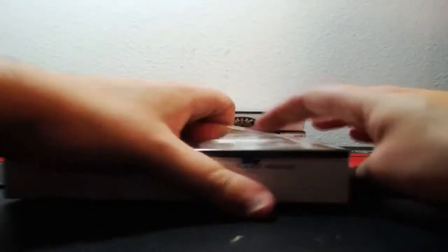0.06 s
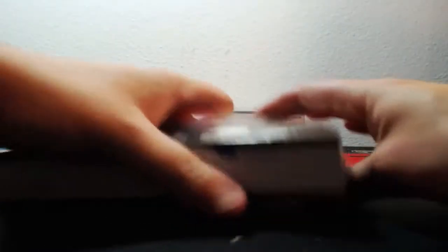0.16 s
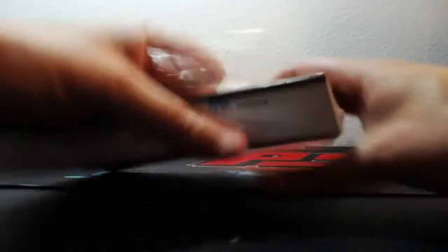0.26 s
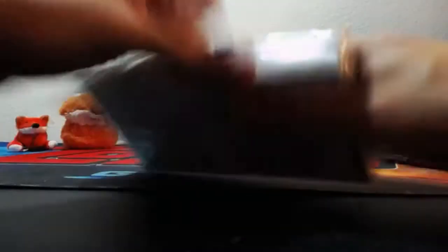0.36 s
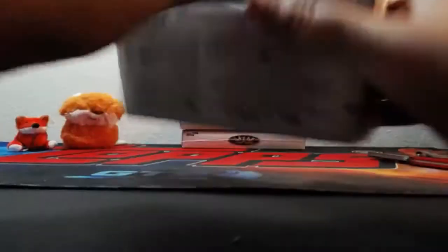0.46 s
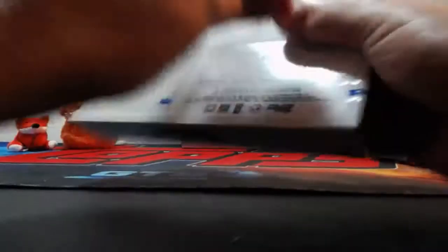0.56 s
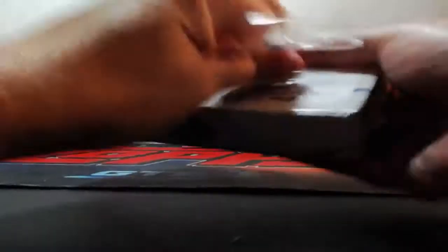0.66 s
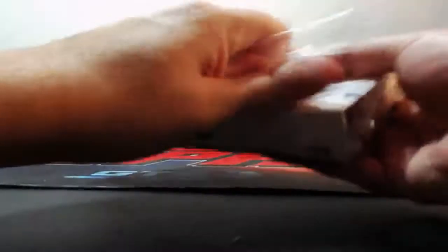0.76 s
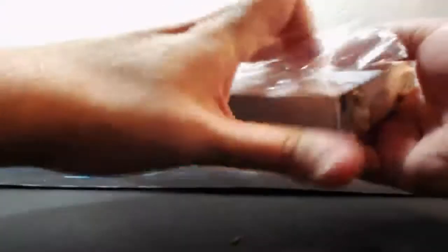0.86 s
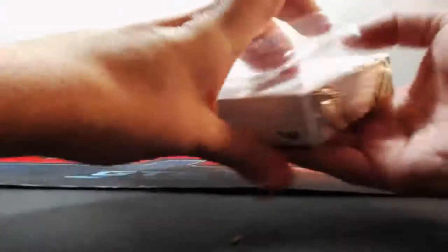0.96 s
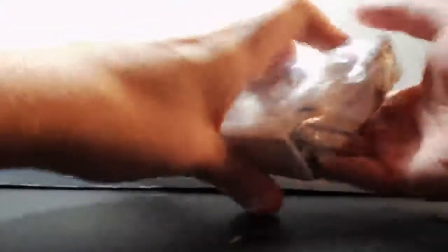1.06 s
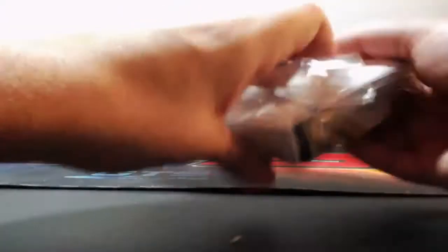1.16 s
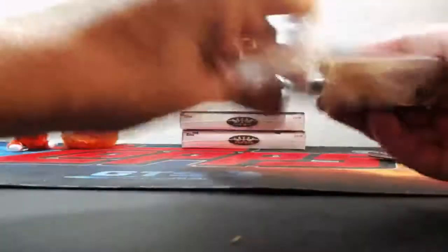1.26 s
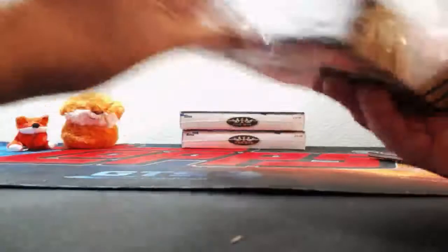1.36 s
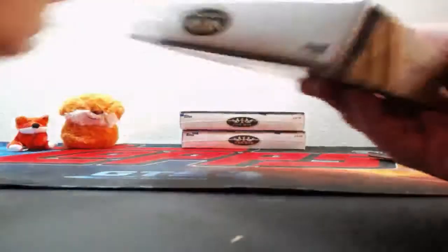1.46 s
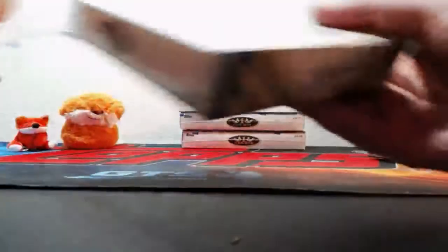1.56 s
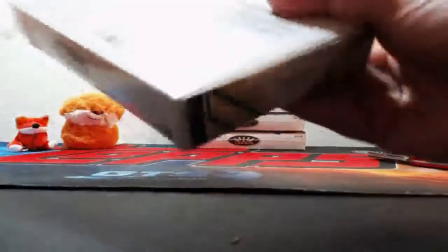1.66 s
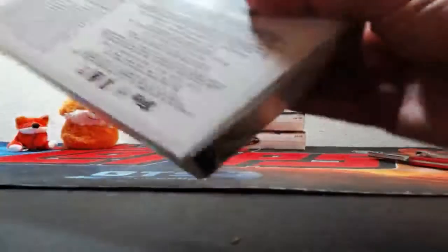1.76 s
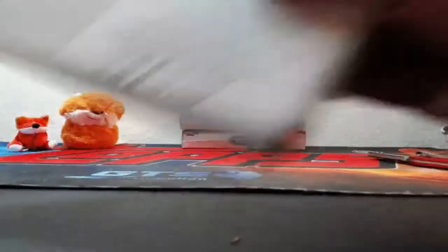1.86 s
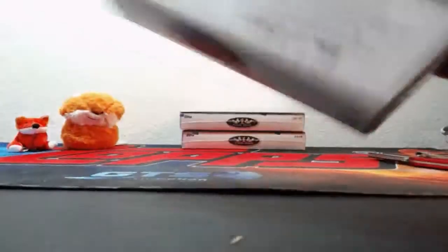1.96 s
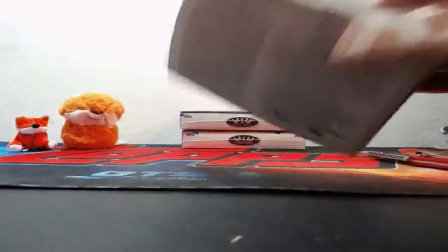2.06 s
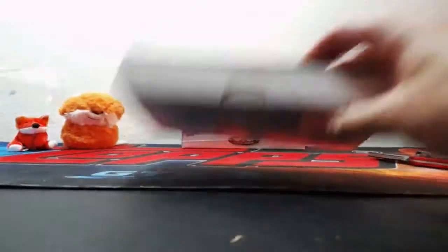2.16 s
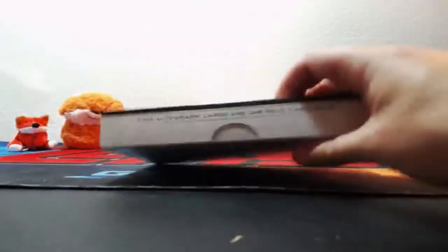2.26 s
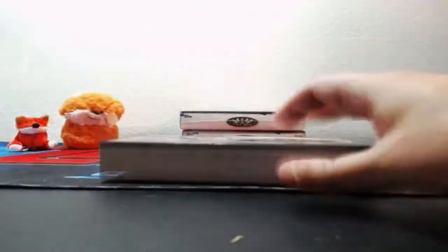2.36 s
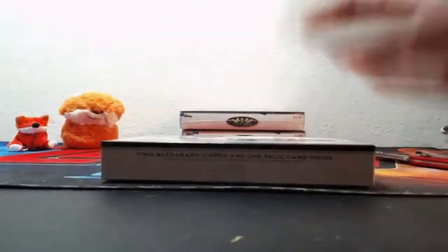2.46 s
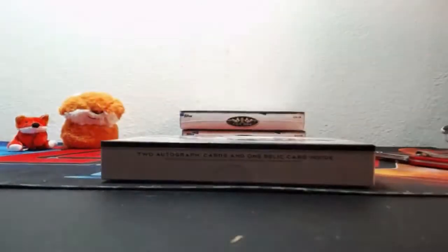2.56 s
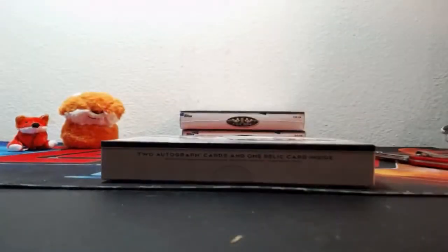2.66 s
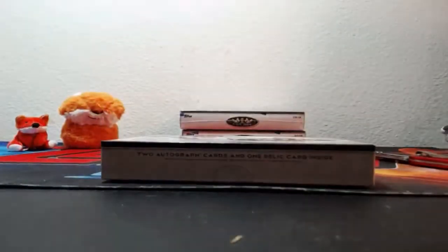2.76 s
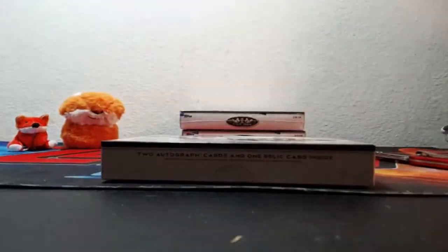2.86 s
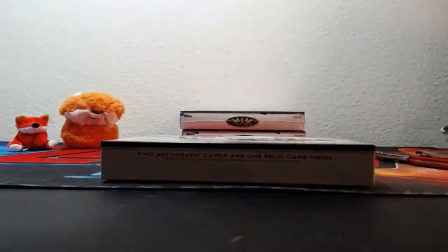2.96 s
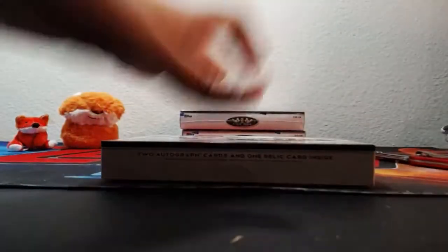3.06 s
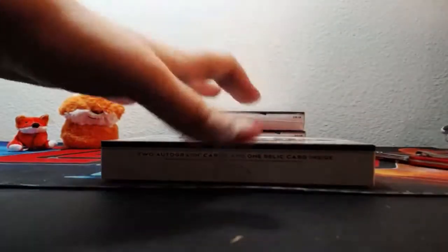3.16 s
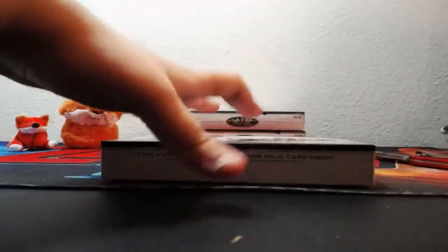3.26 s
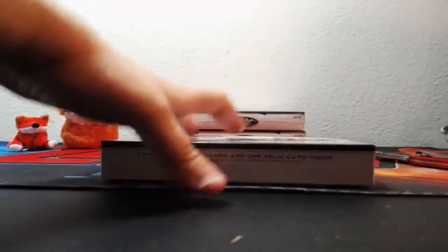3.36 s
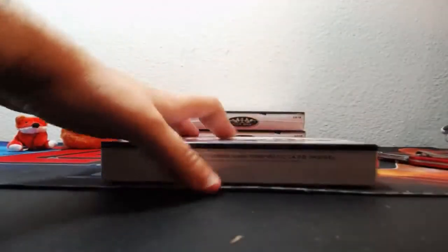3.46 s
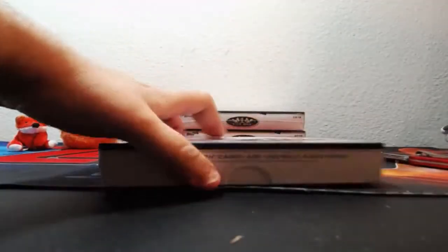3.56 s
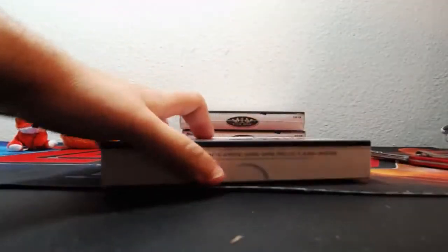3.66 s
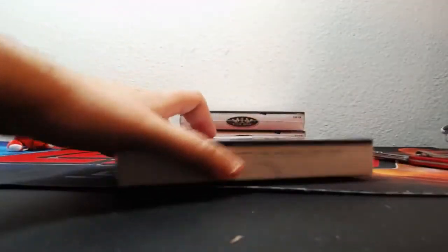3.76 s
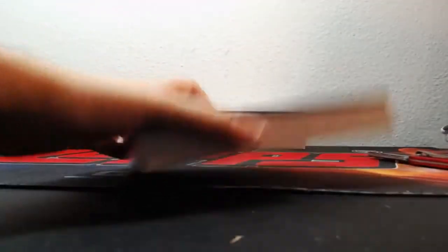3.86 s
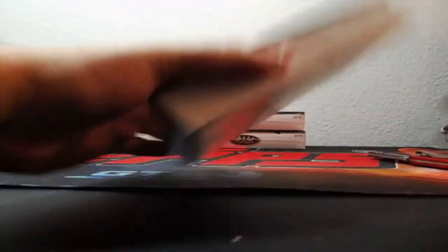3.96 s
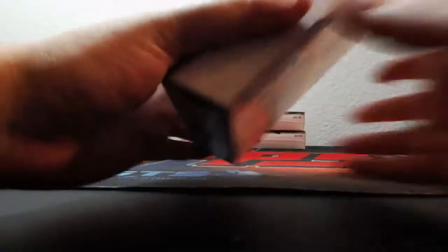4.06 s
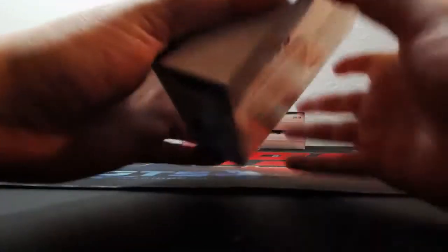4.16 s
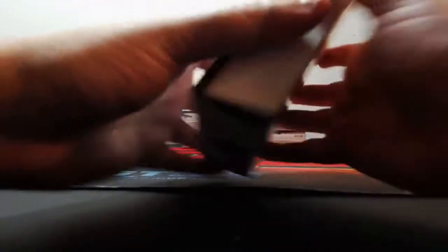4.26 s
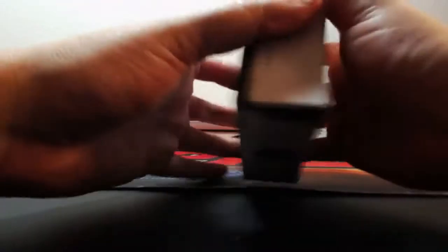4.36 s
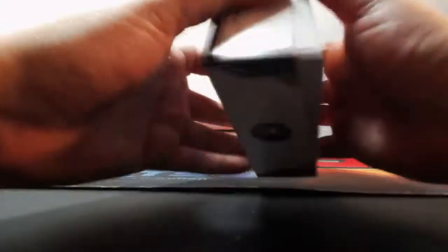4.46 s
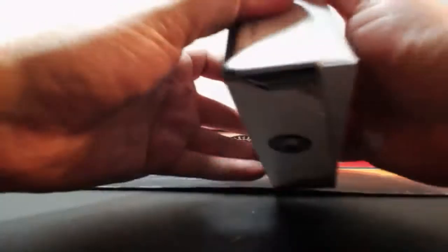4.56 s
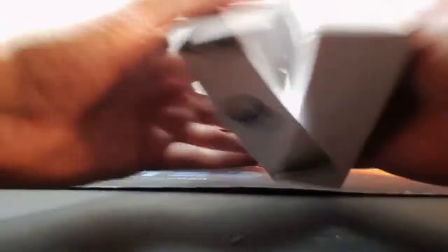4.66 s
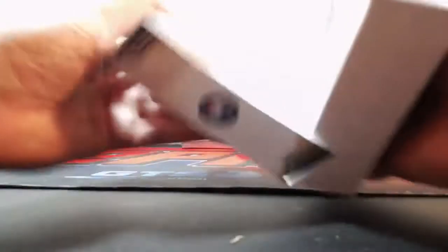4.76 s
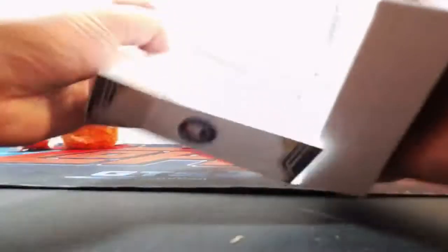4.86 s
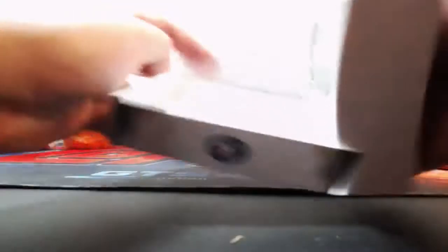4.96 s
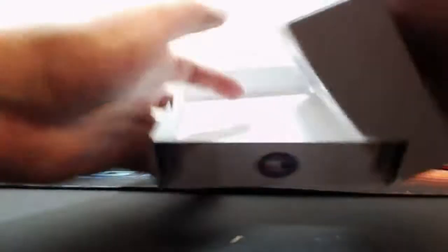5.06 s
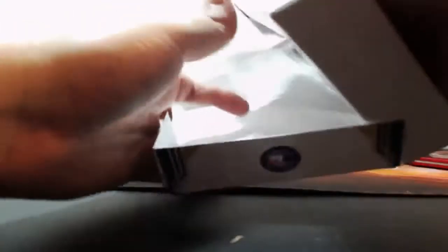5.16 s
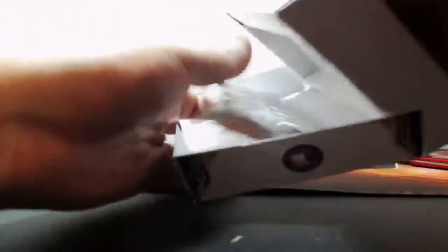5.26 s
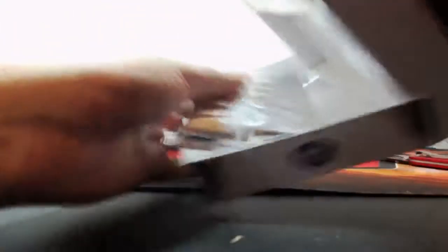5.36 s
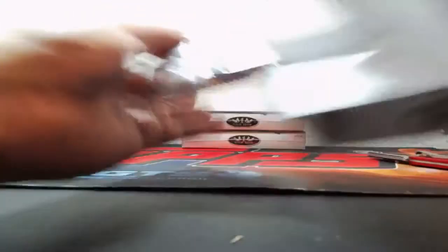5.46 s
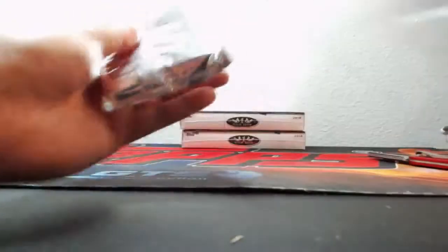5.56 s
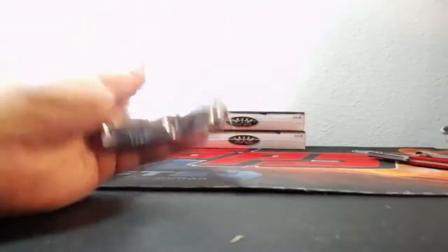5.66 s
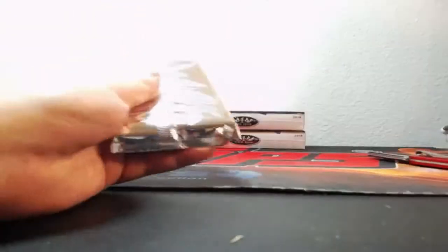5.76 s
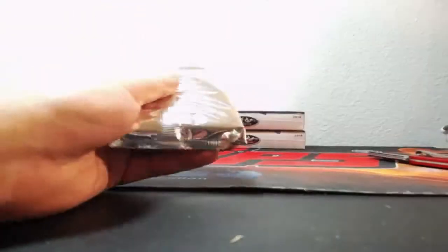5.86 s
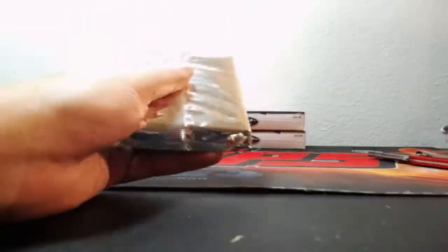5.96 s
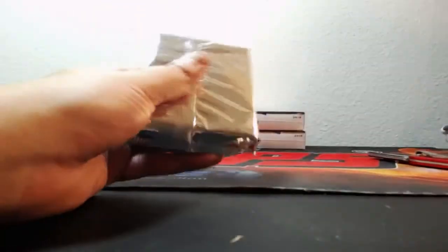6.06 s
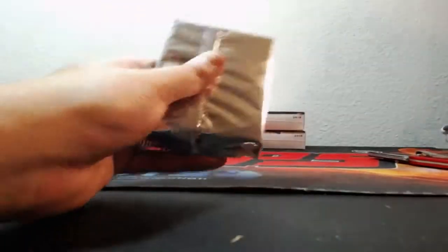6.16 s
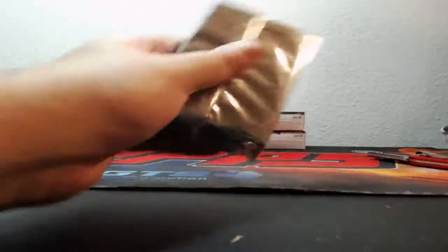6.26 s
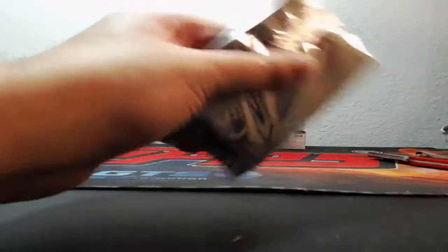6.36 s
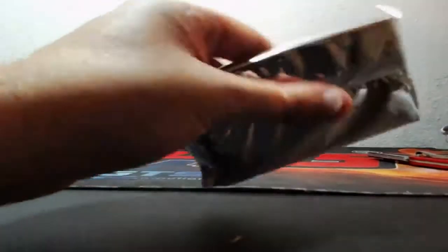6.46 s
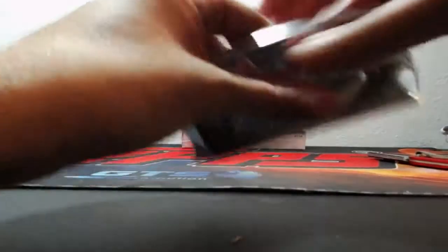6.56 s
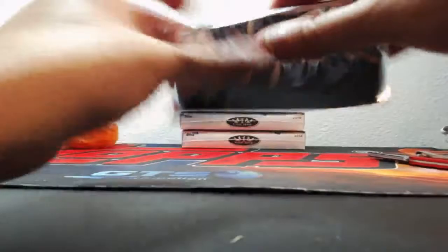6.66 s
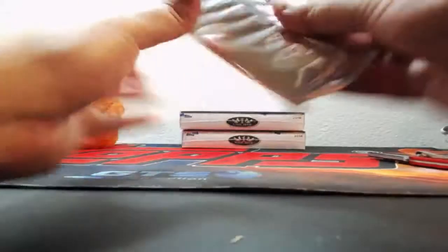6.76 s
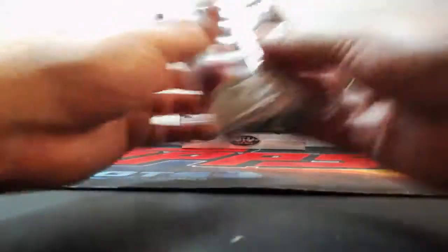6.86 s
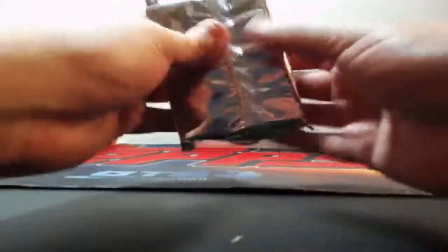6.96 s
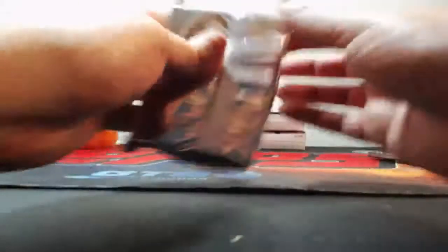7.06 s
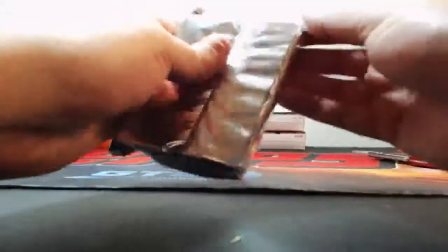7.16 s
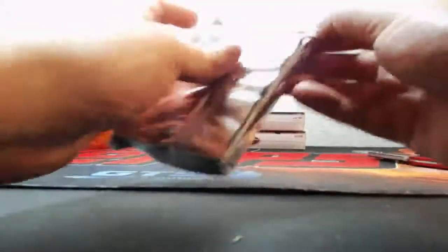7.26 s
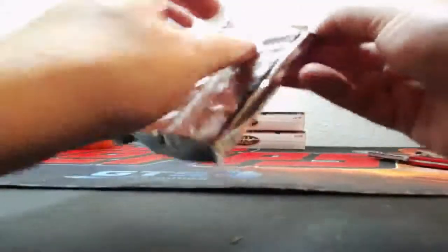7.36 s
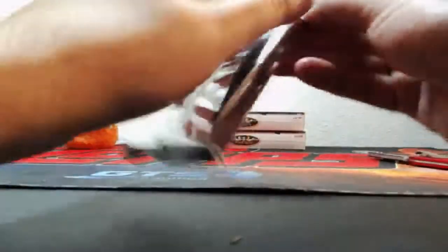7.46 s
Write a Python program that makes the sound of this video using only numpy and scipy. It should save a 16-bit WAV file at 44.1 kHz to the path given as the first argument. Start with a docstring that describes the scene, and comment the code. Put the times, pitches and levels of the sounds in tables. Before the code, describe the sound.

A quiet small room with a faint steady rush, miked closely in stereo. From 0 to 1.8 s hands work shrink film off a cardboard box: a hard snap and thud near 0.15, hollow low knocks and rubs, gentle crinkling, then dense bright rustle with a loud crack around 1.05-1.35 and a tight cluster of snaps at 1.73. At 2.15-2.3 the box lands on the desk in a few dull, woody thumps, followed by a brief film rustle at 2.5. Near silence until faint finger touches at 3.3-3.7. From 4 s soft card rubs and small creaks, a sharper knock at 4.55, then the lid opens with crisp pops at 5.07-5.3, the last hollow and loudest. A tiny click at 5.5 and a foil tick at 5.75. A scrape and hollow bump come at 6.08, then light, irregular foil crackles and dry ticks continue to 7.5.

```python
"""Film and foil buckle in sharp snaps, noise pulses filtered by sheet modes, over a bed of tiny creases.
Hands pull the shrink film off a cardboard box of trading cards, set the box on the desk, open its lid,
take out a foil pack and start to pinch it open, close to a small stereo microphone in a quiet room.
The box knocks with damped wall tones, noise and low thuds; creaks and rubs are stick-slip noise,
and the taut pack clicks through resonators. Reflections and a faint rush surround it all."""
import sys
import numpy as np
from scipy import signal
from scipy.fft import rfft, irfft, next_fast_len
from scipy.io import wavfile

SR = 44100
rng = np.random.default_rng(int(sys.argv[2]) if len(sys.argv) > 2 else 0)


def bounce(signal):
    """Save signal as a 16-bit WAV file at the path given by the first command-line argument."""
    frames = np.transpose(np.atleast_2d(signal))
    limited = np.clip(frames, -1, 1)
    pcm = np.round(limited * 32767).astype(np.int16)
    wavfile.write(sys.argv[1], SR, pcm)


N = 331191
TIME = np.arange(N) / SR  # s
HIT_TIME = TIME[:8192]  # s, long enough for one short event
TOP_HZ = 16300  # upper limit of the resonators and the microphone

# Spectrum of struck or scraped cardboard. Each row: frequency in Hz, relative level in dB per Hz.
CARDBOARD_SPECTRUM = [(30, -19.5), (120, -13), (230, -12), (400, -6.5), (650, -1), (900, 1.5),
                      (1250, -14.5), (1700, -20.5), (3000, -35.5), (8000, -65)]
# Stereo width of the two microphone ports. Each row: frequency in Hz, side minus mid in dB.
STEREO_WIDTH = [(250, -15), (600, -17), (1400, -4.5), (2800, -4), (5000, -0.5)]


def undb(db):
    """Decibels are logarithmic: 20 dB is a factor of ten in amplitude."""
    return 10 ** (np.asarray(db) / 20)


def unit(x):
    """Normalisation by mean power: scale to rms 1."""
    return x / np.sqrt(np.mean(x ** 2))


def dose(x, seconds=0.019):
    """Normalisation by energy: scale a transient to what rms 1 has over the given time."""
    energy = np.mean(np.sum(x ** 2, axis=-1))
    return x * np.sqrt(seconds * SR / energy)


def add(out, s, x):
    """Superposition: mix x into out from time s."""
    i = max(int(s * SR), 0)
    out[:, i:i + x.shape[-1]] += x[..., :max(N - i, 0)]


def colour(x, points):
    """Minimum-phase filtering: a causal response through (Hz, dB) points, from a folded cepstrum."""
    n = 2 * next_fast_len(x.shape[-1] // 2 + 512)
    hz, db = np.transpose(points)
    bin_hz = np.arange(n // 2 + 1) * SR / n
    gain = undb(np.interp(np.log(bin_hz + 1), np.log(hz), db))
    cepstrum = irfft(np.log(gain))
    cepstrum[1:n // 2] *= 2
    cepstrum[n // 2 + 1:] = 0
    response = np.exp(rfft(cepstrum))
    return irfft(rfft(x, n) * response)[..., :x.shape[-1]]


def resonate(x, hz, q):
    """Damped simple resonance: a two-pole band-pass whose ringing lengthens with q."""
    w = 2 * np.pi * min(hz, TOP_HZ) / SR
    a = np.sin(w) / (2 * q)
    return signal.lfilter([a, 0, -a], [1 + a, -2 * np.cos(w), 1 - a], x)


def burst(envelope):
    """Partial coherence: enveloped stereo noise, left and right alike in the bass, apart in the treble."""
    mid, side = rng.standard_normal((2, len(envelope))) * envelope
    side = colour(side, STEREO_WIDTH)
    return np.array([mid + side, mid - side])


def swell(t, rise, decay):
    """Exponential relaxation: an envelope that builds up and dies away."""
    return (1 - np.exp(-t / rise)) * np.exp(-t / decay)


def walk(rate):
    """Slow random modulation: a smooth wander through `rate` random points per second, spread near 1."""
    return np.interp(TIME * rate, np.arange(N), rng.standard_normal(N))


def grains(rate, spread_db, decay_s, smooth):
    """Shot noise: an envelope of countless small slips, a few much larger, over even sliding."""
    sizes = undb(spread_db * np.minimum(rng.exponential(size=N), 4))
    slips = (rng.random(N) < rate / SR) * sizes ** 2
    power = signal.lfilter([1], [1, -np.exp(-2 / (decay_s * SR))], slips)
    return np.sqrt(power / power.mean() + smooth ** 2)


def stroke(length, attack_s, sag_db_per_s, release_s):
    """Force of one hand movement: it takes hold, loses force while it lasts and lets go."""
    t = TIME[:SR]
    held = np.minimum(t, length)
    attack = np.minimum(t / attack_s, 1)
    release = np.exp((held - t) / release_s)
    return attack * undb(-sag_db_per_s * held) * release


def panel(x, hz, q, share, count=4):
    """Modal response: each bent patch of sheet has a few modes of its own, scattered around hz."""
    octaves = rng.uniform(-0.53, 0.48, count)
    return x + share * sum(resonate(x, hz * 2 ** octave, q) for octave in octaves)


def patches(lowest_hz, count, flicker_db):
    """Independent band modulation: half-octave noise bands flare and fade as the contact shifts."""
    pair = np.zeros((2, N))
    for hz in lowest_hz * 2 ** (np.arange(count) / 2):
        flickering = rng.standard_normal((2, N)) * undb(flicker_db * walk(70))
        pair += resonate(flickering, hz, 1.8) / np.sqrt(hz)
    side = colour(pair[1], STEREO_WIDTH)
    return np.array([pair[0] + side, pair[0] - side])


def room_tone():
    """Stationary broadband noise: a faint, even rush of room air and microphone hiss."""
    # Each row: frequency in Hz, relative level in dB per Hz.
    tone_spectrum = [(20, -0.5), (168, -10), (241, -9), (399, -11), (802, -14.5), (2000, -34),
                     (8650, -44.5), (16000, -57.5)]
    level_db = -53.5
    rush = burst(undb(1.3 * walk(15.0)))
    return undb(level_db) * unit(colour(rush, tone_spectrum))


def room(x, early_db=-16, early_s=0.0037, late_db=-24, late_s=0.031):
    """Reflection: desk and wall answer quickly; the small room adds a short, duller tail."""
    t = TIME[:SR // 2]
    early = burst((t > .002) * np.exp(-t / early_s))
    late = burst((t > .012) * np.exp(-t / late_s))
    late = colour(late, [(400, 9.0), (900, 2.5), (8000, -1.5), (15000, -7.5)])
    response = undb(early_db) * dose(early, 1 / SR) + undb(late_db) * dose(late, 1 / SR)
    return x + signal.fftconvolve(x, response, axes=1)[:, :N]


def desk():
    """Modal decay: the modes of the desk top boom on after the heaviest blows."""
    # Blows that reach the desk. Each row: start in seconds, level in dB.
    landings = [(0.169, -38), (2.151, -37), (2.288, -23.5)]
    # Modes of the desk. Each row: frequency in Hz, relative level in dB, 60 dB decay time in seconds.
    desk_modes = [(50, -3.5, 0.55), (100.8, 9, 0.36), (126, -3, 0.42), (534, -3, 0.2)]
    rise_s = 0.0062
    out, t = np.zeros((2, N)), TIME[:SR]
    boom = sum(undb(db - 60 * t / t60) * np.sin(2 * np.pi * hz * t) for hz, db, t60 in desk_modes)
    for s, db in landings:
        add(out, s, undb(db) * dose(boom, 0.13) * np.minimum(t / rise_s, 1))
    return out


def holding():
    """Random modulation of grip: faint rustle, crinkle and rub envelopes of fingers that never rest."""
    # Each row: start in seconds, end in seconds, rustle in dB, crinkle in dB, rub in dB.
    holds = [(-0.05, 1.9, -56, -60, -51.5), (3.97, 5.15, -67, -62, -55), (6.02, 7.52, -64.5, -65.5, -61.5)]
    grip_fade_s, fidget_db, fidget_per_s = 0.052, 4.2, 17
    out = 0
    for start, end, *db in holds:
        grip = np.clip(np.minimum(TIME - start, end - TIME) / grip_fade_s, 0, 1)
        out = out + undb(db)[:, None] * grip
    return out * undb(fidget_db * walk(fidget_per_s))


def rubbing(held):
    """Stick-slip friction of skin and card; the hollow box gives the scrape its pitch."""
    # Pushes of fingers, flaps and pack. Each row: start in seconds, length in seconds, level in dB.
    pushes = [(0.038, 0.12, -37), (0.114, 0.096, -27.5), (0.257, 0.2, -35), (0.572, 0.26, -37),
              (0.823, 0.09, -33.5), (0.915, 0.17, -36.5), (1.058, 0.14, -30.5), (1.222, 0.32, -31.5),
              (1.601, 0.051, -32), (2.461, 0.19, -40.5), (3.968, 0.024, -36), (4.087, 0.029, -40),
              (4.226, 0.035, -34.5), (4.325, 0.1, -37.5), (4.484, 0.059, -29), (4.858, 0.15, -42.5),
              (4.963, 0.2, -42), (5.144, 0.088, -36.5), (5.256, 0.12, -30.5), (6.023, 0.17, -28),
              (6.197, 0.084, -41), (6.079, 0.042, -19), (6.482, 0.008, -30.5), (6.527, 0.04, -34)]
    attack_s, sag_db_per_s, release_s = 0.012, 53.5, 0.007
    power = held[None] ** 2
    for s, length, db in pushes:
        push = undb(db) * stroke(length, attack_s, sag_db_per_s, release_s)
        add(power, s, push ** 2)
    slips = burst(grains(rate=130, spread_db=0.5, decay_s=0.0073, smooth=0.89))
    return unit(colour(slips, CARDBOARD_SPECTRUM)) * np.sqrt(power)


def box(rise_s=0.00079, clatter_s=0.0085, damped_s=0.035):
    """Impact excitation: a blow rings a wall, rattles the contents, cracks at the edge, shoves the box."""
    # Blows on box and pack. Each row: start in seconds, pitch of the struck wall in Hz, ring in dB,
    # clatter in dB, crack in dB, thud pitch in Hz, thud in dB.
    knocks = [(0.056, 1000, -39, -30.5, -40.5, 172, -37.5), (0.165, 880, -34.5, -19, -33, 162.4, -15.5),
              (0.295, 666, -26.5, -30.5, -56, 260, -23), (0.311, 484, -25, -45, -62, 215, -41),
              (0.349, 756, -21.5, -21, -49, 192, -24.5), (0.416, 870, -30.5, -31.5, -74, 249, -28.5),
              (0.669, 820, -34.5, -40, -33.5, 189, -37), (0.839, 840, -24, -28.5, -41, 181, -31),
              (0.862, 885, -25.5, -32.5, -50, 230, -41.5), (0.875, 840, -24, -29, -48.5, 231, -37.5),
              (0.9764, 992, -19.5, -27, -53.5, 235, -36.5), (1.146, 690, -22, -30.5, -30.5, 296.6, -21.5),
              (1.185, 652, -9.5, -17, -54, 247, -54), (1.231, 750, -38.5, -27, -53, 240, -35),
              (1.239, 890, -26, -19.5, -34.5, 271, -27), (1.337, 980, -28, -27, -36.5, 243, -45.5),
              (1.627, 870, -27.5, -52, -45.5, 255, -65), (1.7365, 970, -18, -15.5, -23, 234, -30.5),
              (1.744, 716, -16.5, -23, -32.5, 240, -39), (2.047, 944, -40.5, -37, -77, 135, -54),
              (2.148, 1560, -24.5, -28, -30.5, 204, -15.5), (2.224, 660, -21, -29, -29, 250, -12.5),
              (2.2355, 357, -20.5, -35.5, -60, 240, -27), (2.2854, 537, -16, -19, -49, 126, -13),
              (2.2926, 740, -29.5, -37, -53, 198, -20), (3.311, 390, -81, -73, -57.5, 180.5, -37),
              (3.558, 506, -56, -59, -61, 142, -35.5), (4.124, 670, -37, -40, -58, 187, -47.5),
              (4.385, 815, -32.5, -35, -63.5, 242, -35), (4.498, 430, -38, -35, -53, 147, -33),
              (4.516, 860, -30, -46, -48, 230, -37.5), (4.5473, 774, -22, -16, -19.5, 230, -22),
              (4.627, 710, -57, -40.5, -49, 264, -38), (4.889, 735, -44.5, -66, -34.5, 97, -37.5),
              (5.072, 1360, -37, -45, -31.5, 210, -35), (5.149, 736, -23, -23.5, -30, 218, -25.5),
              (5.157, 436, -25.5, -36.5, -44, 240, -42.5), (5.295, 860, -8.5, -18, -10, 263, -54.5),
              (5.322, 860, -8.5, -18, -17.5, 192.6, -44), (6.087, 636, -13, -17.5, -47, 303, -48),
              (6.5635, 440, -44, -48.5, -58, 300, -48), (6.772, 1096, -47, -41, -64, 40.2, -23.5),
              (6.83, 1130, -58, -45, -59, 45, -38)]
    # Upper modes of the cardboard walls. Each row: frequency in Hz, q, level in dB.
    wall_modes = [(1410, 27, 4), (2015, 13, 4.5), (2720, 13, 4.5)]
    # Each row: frequency in Hz, relative level in dB per Hz.
    crack_spectrum = [(500, -38), (1100, -0.5), (1500, 5.5), (2000, 0.5), (2600, -10.5), (4000, -11),
                      (8000, -30.5), (15000, -50.5)]
    # contents damp the shut box; with the lid open its walls swell and ring: rise s, decay s
    lid_opens_s, shut_ring, open_ring = 4.7, (0.00048, 0.0028), (0.004, 0.0079)
    out = np.zeros((2, N))
    damping = np.exp(-(HIT_TIME / damped_s) ** 2)  # the holding hand soon stills the box
    for s, wall_hz, ring_db, clatter_db, crack_db, thud_hz, thud_db in knocks:
        # the wall is stiffer while it is bent, so its pitch sags as it dies
        wall = np.sin(2 * np.pi * wall_hz * HIT_TIME * (1.03 - 1.6 * HIT_TIME))
        rise_decay_s = open_ring if s > lid_opens_s else shut_ring
        ring = damping * wall * swell(HIT_TIME, *rise_decay_s)

        clatter = colour(burst(swell(HIT_TIME, rise_s, clatter_s)), CARDBOARD_SPECTRUM)

        edge = burst(swell(HIT_TIME, 0.00029, 0.0056))
        edge_mid = edge.mean(axis=0)
        edge_ring = sum(undb(db) * resonate(edge_mid, hz, q) for hz, q, db in wall_modes)
        crack = colour(edge + edge_ring, crack_spectrum)

        # the heavy, well damped body swings only once or twice
        cycles = HIT_TIME * thud_hz
        swing = np.sin(2 * np.pi * cycles) * swell(cycles, 0.33, 0.56)
        shudder = burst(np.exp(-cycles / 2.9))
        shudder = resonate(resonate(shudder, thud_hz, 0.86), thud_hz, 0.86)
        thud = (dose(swing) + dose(shudder)) * damping

        for db, part in [(ring_db, ring), (clatter_db, clatter), (crack_db, crack), (thud_db, thud)]:
            add(out, s, undb(db) * dose(part))
    return out


def creaks():
    """Stick-slip excitation: a dragged edge jerks and keeps one rising resonance of the sheet ringing."""
    # Film or card over an edge. Each row: start in seconds, length in seconds, pitch in Hz, level in dB.
    drags = [(0.038, 0.06, 1780, -36.5), (0.082, 0.053, 259, -36.5), (0.187, 0.19, 250, -36),
             (0.296, 0.03, 5000, -33), (1.053, 0.029, 1300, -29.5), (1.092, 0.034, 3100, -31.5),
             (1.118, 0.033, 3400, -27.5), (2.456, 0.064, 3240, -36), (3.665, 0.055, 1300, -53),
             (3.973, 0.041, 1105, -45), (4.012, 0.059, 4150, -62.5), (4.1, 0.017, 1250, -35.5),
             (4.329, 0.067, 1420, -43.5), (4.482, 0.084, 1350, -34), (4.829, 0.102, 740, -48.5),
             (4.973, 0.048, 1760, -42), (5.207, 0.009, 1000, -26), (6.153, 0.024, 690, -34.5)]
    pitch_rise = 0.1  # the sheet tightens: pitch starts this share below and ends this share above
    out = np.zeros((2, N))
    jerks = grains(rate=53, spread_db=4.5, decay_s=0.0012, smooth=0.45)
    for s, length, hz, db in drags:
        force = np.sin(np.pi * np.minimum(HIT_TIME / length, 1)) ** 2
        drag = burst(np.sqrt(force) * jerks[int(s * SR):][:len(HIT_TIME)])
        ringing = resonate(resonate(drag, hz, 3.5), hz, 3.5)
        # reading the ringing ever faster raises its pitch
        tightening = HIT_TIME * (1 + pitch_rise * (HIT_TIME / length - 1))
        creak = np.array([np.interp(tightening, HIT_TIME, channel) for channel in ringing])
        add(out, s, undb(db) * dose(creak, length))
    return out


def flicks():
    """Impulsive modal excitation: foil stretched over the cards clicks dryly in its own modes."""
    # The taut face of the sealed pack flicks in and out under the thumb.
    # Each row: start in seconds, level in dB.
    clicks = [(5.502, -29.5), (5.736, -49), (5.76, -43.5), (6.134, -46), (6.145, -37.5), (6.3053, -40)]
    # Modes of that face. Each row: frequency in Hz, q, level in dB.
    face_modes = [(1887, 14, 1.5), (2260, 5.2, 8.5), (2730, 14, -4.5), (7200, 10, -6)]
    # The cards behind the face deaden its top. Each row: frequency in Hz, gain in dB.
    card_damping = [(10000, 2), (14000, -12)]
    rise_s, decay_s = 0.00088, 0.0014
    out = np.zeros((2, N))
    for s, db in clicks:
        flip = burst(swell(HIT_TIME[:len(HIT_TIME) // 2], rise_s, decay_s))
        face = sum(undb(mode_db) * resonate(flip, hz, q) for hz, q, mode_db in face_modes)
        add(out, s, undb(db) * dose(colour(face, card_damping)))
    return out


def film(held_rustle, held_crinkle):
    """Crackling noise: tiny creases fizz and tick, larger ones crinkle lower down; bare card only hisses."""
    # Pulls and squeezes of film or foil, slides over bare card.
    # Each row: start in seconds, length in seconds, rustle in dB, coarse crinkle in dB.
    pulls = [(0.092, 0.22, -49, -40), (0.406, 0.14, -45, -46.5), (0.568, 0.082, -42.5, -45),
             (0.658, 0.033, -35, -35.5), (0.966, 0.26, -43.5, -42.5), (1.06, 0.11, -25.5, -30.5),
             (1.215, 0.14, -25, -33.5), (1.296, 0.17, -32.5, -43), (1.463, 0.1, -37.5, -46.5),
             (1.804, 0.26, -55.5, -55.5), (2.25, 0.33, -48.5, -45.5), (2.46, 0.21, -37.5, -39.5),
             (3.365, 0.042, -49, -46.5), (3.448, 0.073, -53, -63), (3.6, 0.062, -61, -63),
             (4.48, 0.2, -51, -61), (4.885, 0.0087, -46, -42.5), (5.07, 0.04, -55, -39),
             (5.141, 0.064, -44, -37.5), (5.247, 0.065, -45.5, -28.5), (6.023, 0.11, -47, -33),
             (6.511, 0.026, -39, -38), (6.776, 0.12, -53, -45.5), (7.3, 0.079, -46.5, -52.5)]
    # Thin film, then larger creases. Each row: frequency in Hz, relative level in dB per Hz.
    film_spectrum = [(1000, -24.5), (2800, -16), (4400, -5), (7400, 3.5), (9500, -4), (11500, -5),
                     (16000, -15)]
    crease_spectrum = [(400, -24), (1000, 3.5), (1600, -4), (3500, 0.5), (5000, -2), (9000, -20)]
    attack_s, sag_db_per_s, release_s = 0.024, 50, 0.022
    # crumpled sheet slowly unfolds afterwards: level after a pull of one second, less after shorter ones
    unfold_db, unfold_s = -51, 0.2
    # lone ticks against fizz: limp film mostly fizzes, stiff foil mostly ticks
    film_ticks, foil_ticks, foil_from_s = 0.85, 1.8, 6.2
    # while the closed box is handled bare, skin slides on the card with a smooth, wavering hiss
    bare_from_s, bare_to_s, waver_db, waver_per_s = 2.0, 5.05, 2.5, 70

    power = np.array([held_rustle, held_crinkle]) ** 2
    unfolding = undb(unfold_db) * np.exp(-TIME[:2 * SR] / unfold_s)
    for s, length, rustle_db, crinkle_db in pulls:
        pull = stroke(length, attack_s, sag_db_per_s, release_s)
        add(power, s, (undb([[rustle_db], [crinkle_db]]) * pull) ** 2)
        add(power, s + length, (length * unfolding) ** 2)
    fine, coarse = np.sqrt(power)

    fizz = grains(rate=500, spread_db=4, decay_s=0.002, smooth=0.55)
    ticks = grains(rate=90, spread_db=3, decay_s=.0005, smooth=0)
    tick_share = np.where(TIME < foil_from_s, film_ticks, foil_ticks)
    creasing = np.hypot(fizz, tick_share * ticks) / np.hypot(1, tick_share)
    bare = (TIME > bare_from_s) & (TIME < bare_to_s)
    creasing = np.where(bare, undb(waver_db * walk(waver_per_s)), creasing)

    rustle = unit(colour(creasing * patches(3300, count=5, flicker_db=4.0), film_spectrum))
    crinkle = unit(colour(creasing * patches(870, count=5, flicker_db=4.0), crease_spectrum))
    return rustle * fine + crinkle * coarse


def snaps(shiver_db=-26):
    """Snap-through buckling: a crease flips in about a millisecond; the sheet pops and shivers briefly."""
    # Creases of film and foil that buckle.
    # Each row: start in seconds, snap in dB, centre in Hz, pop of the sheet in dB.
    buckles = [(0.1302, -10.5, 8440, -19), (0.168, -17.5, 5850, -24), (0.669, -23.5, 7050, -48),
               (0.687, -30, 6400, -33), (0.9403, -35, 6700, -44), (1.0862, -20, 6300, -42),
               (1.185, -8, 5900, -21), (1.246, -20.5, 6900, -42), (1.3395, -17.5, 5430, -26),
               (1.362, -20.5, 6340, -31.5), (1.4435, -33, 8250, -56), (1.7273, -24, 8000, -35),
               (1.7334, -11, 5900, -16.5), (1.7365, -12.5, 7800, -6.5), (1.7418, -11.5, 7200, -38),
               (1.761, -18, 7200, -34), (2.5391, -26, 5800, -64), (4.4181, -49, 4393, -31.5),
               (4.933, -60, 3000, -31), (5.0712, -12, 6580, -16), (5.1492, -30, 3030, -15),
               (5.2225, -26, 5430, -21), (5.232, -34, 5400, -35), (5.254, -49, 4000, -23),
               (5.2643, -15, 4950, -15.5), (5.2657, -11, 4730, -9.5), (5.288, -27.5, 4000, -20),
               (5.2972, -20.5, 3927, -10.5), (5.749, -28, 3300, -31), (6.0376, -24, 4420, -33),
               (6.048, -27, 4530, -30), (6.2076, -34.5, 9900, -46), (6.4892, -36, 5800, -36),
               (6.534, -43, 4500, -37), (6.5407, -39, 6450, -27.5), (6.5659, -28.5, 5800, -36.5),
               (6.7715, -24, 3890, -28.5), (6.7922, -29, 6130, -35), (7.052, -33.5, 6430, -39.5),
               (7.069, -25.5, 6650, -30), (7.0937, -21.5, 5100, -16.5), (7.1313, -25.5, 7700, -50),
               (7.1418, -37, 4930, -20), (7.182, -34.5, 6600, -35.5), (7.2886, -28.5, 7400, -30.5),
               (7.3093, -20, 6500, -50), (7.458, -17.5, 8400, -25), (7.5079, -17, 4860, -26.5)]
    # Each row: frequency in Hz, relative level in dB per Hz.
    sheet_spectrum = [(100, -27), (450, -15.5), (900, 6), (1700, 4.5), (2700, -4.5), (4500, -13),
                      (10000, -39)]
    # popping a large patch of sheet takes longer: the decay is flip_s doubled at big_pop_db
    rise_s, flip_s, big_pop_db, shiver_s = 0.00084, 0.00031, -19, 0.007
    out, t = np.zeros((2, N)), HIT_TIME[:len(HIT_TIME) // 2]
    for s, db, hz, pop_db in buckles:
        pan_db = 1.5 * rng.standard_normal()  # each crease lies a little to one side
        decay_s = flip_s * (1 + undb(pop_db - big_pop_db))
        flip = swell(t, rise_s, decay_s) + undb(shiver_db) * np.exp(-t / shiver_s)

        crease = resonate(panel(burst(flip), hz, q=23, share=1.3), hz, 0.066)
        crease = colour(crease, [(1200, -14.0), (3000, 6), (11000, 0.0), (15000, -16.5)])
        crease = np.array([dose(channel, 0.0016) for channel in crease])

        pop = panel(burst(flip), 1800, q=34.0, share=0.84)
        pop = dose(colour(pop, sheet_spectrum), 0.0022)

        sides = unit(undb(np.array([[pan_db], [-pan_db]]) / 2))
        add(out, s, sides * (undb(db) * crease + undb(pop_db) * pop))
    return out


def scene():
    """Linear superposition: box, desk and wrappers sound together in the room, over its tone."""
    rustle, crinkle, rub = holding()
    cardboard = desk() + rubbing(rub) + box()
    wrappers = creaks() + flicks() + film(rustle, crinkle) + snaps()
    return room(cardboard + wrappers) + room_tone()


def record(dry):
    """Transduction: the microphone colours the sound, clips beyond full scale and cuts bottom and top."""
    # Colour of the microphone. Each row: frequency in Hz, gain in dB.
    mic_response = [(5800, -0.5), (7600, 0.5), (10000, 0.5), (13500, -2), (16000, -10)]
    bottom_hz = 24
    low_cut = signal.butter(2, bottom_hz, "high", fs=SR, output="sos")
    top_cut = signal.ellip(10, .2, 80, TOP_HZ, fs=SR, output="sos")
    heard = colour(signal.sosfilt(low_cut, dry), mic_response)
    return signal.sosfilt(top_cut, np.clip(heard, -1, 1))


dry = scene()
out = record(dry)
bounce(out)
```